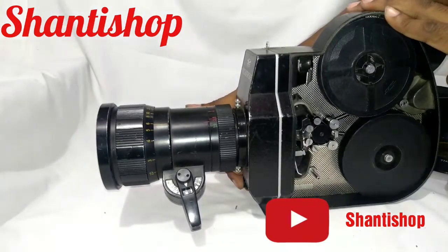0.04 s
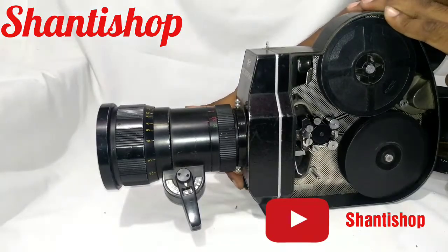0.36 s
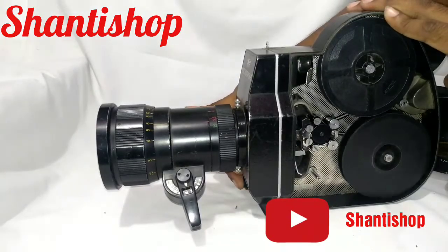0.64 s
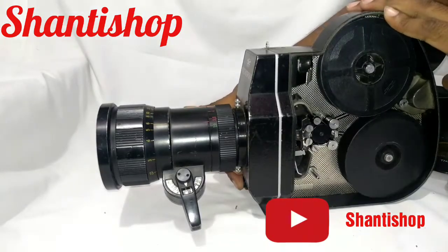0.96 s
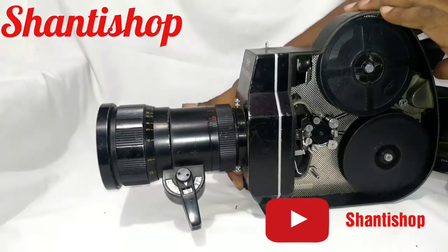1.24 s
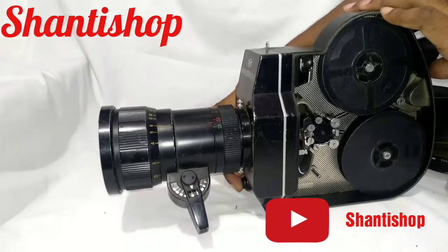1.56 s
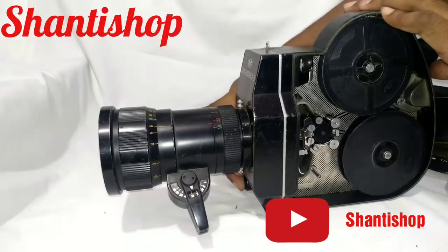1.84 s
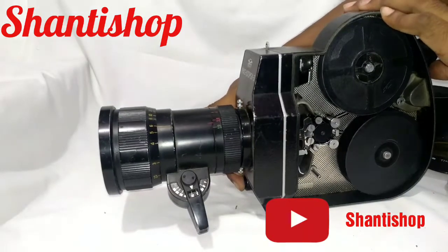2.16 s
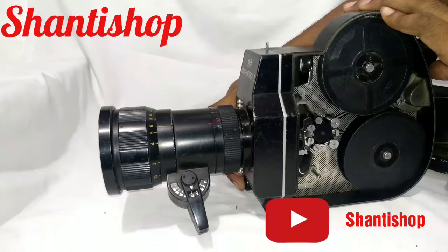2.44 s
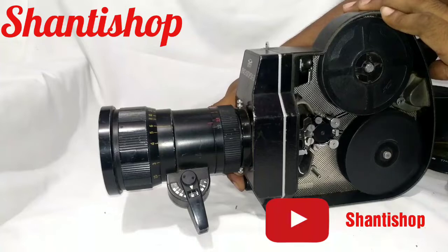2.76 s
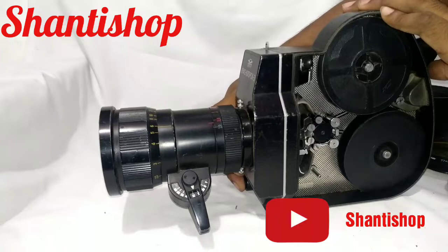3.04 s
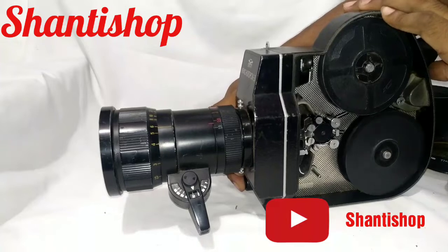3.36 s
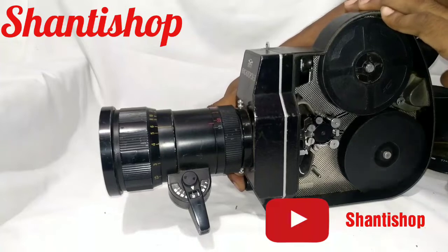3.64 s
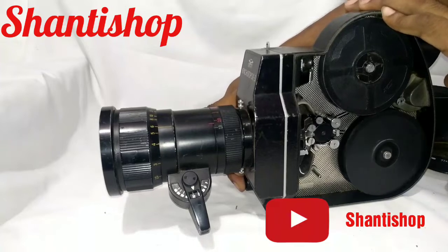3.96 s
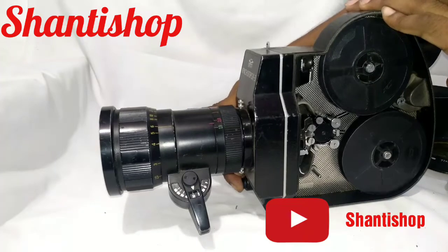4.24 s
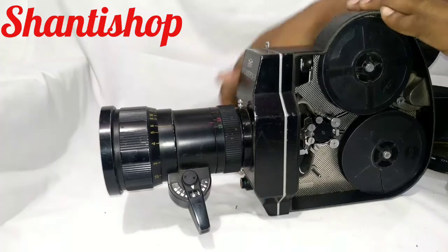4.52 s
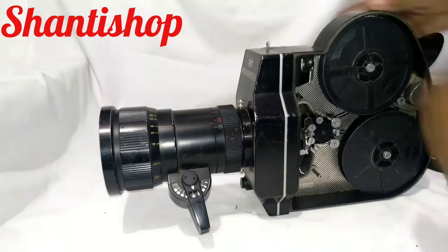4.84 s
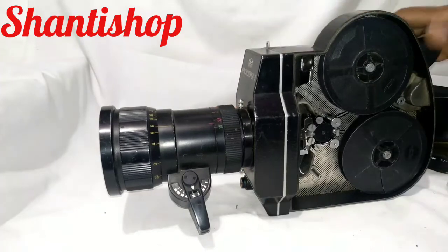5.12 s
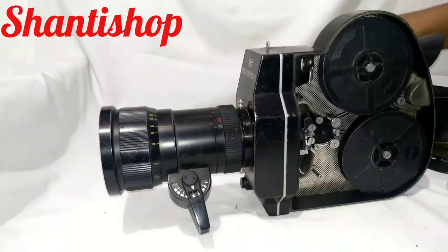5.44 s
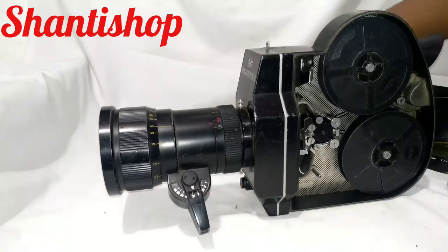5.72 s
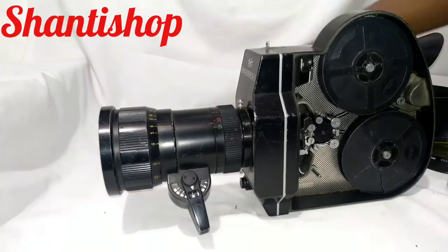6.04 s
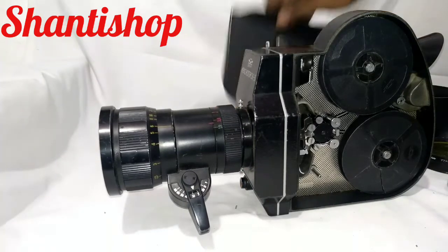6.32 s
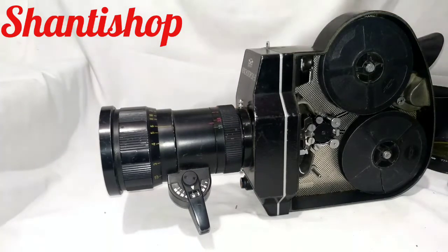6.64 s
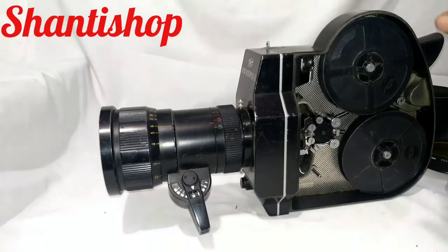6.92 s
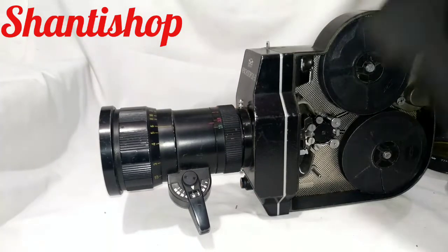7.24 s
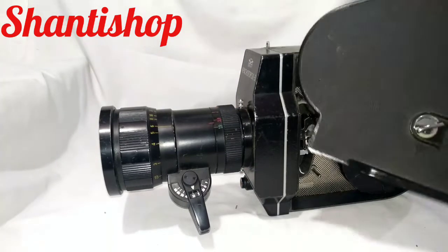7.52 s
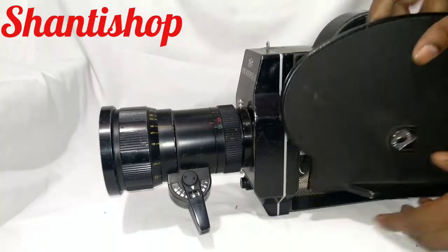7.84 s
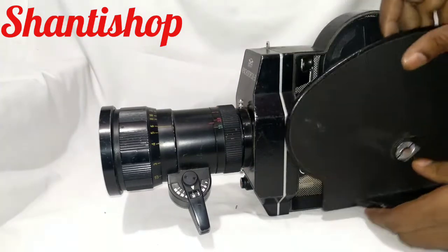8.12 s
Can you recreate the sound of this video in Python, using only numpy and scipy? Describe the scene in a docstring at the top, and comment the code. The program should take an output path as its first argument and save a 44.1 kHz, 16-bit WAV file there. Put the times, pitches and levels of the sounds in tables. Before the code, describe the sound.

A small film camera whirrs and clatters loudly, stops, restarts and stops again, followed by faint rustling and metal cover clanks.

```python
"""First comes the whirr and clatter of a hand-held film camera running with its side open in a small room.
Gears whine and rattle in the metal body while the claw strikes three times a frame. A catch knocks the
drive to a shuddering halt and small springs ring on; it spins up again, holds and is stopped once more.
Then a hand leaves the trigger, cloth rustles, and the side cover scrapes and clanks against the body."""
import sys
import numpy as np
from scipy import signal
from scipy.fft import rfft, irfft
from scipy.io import wavfile
from scipy.ndimage import uniform_filter1d

SR = 44100
rng = np.random.default_rng(int(sys.argv[2]) if len(sys.argv) > 2 else 0)


def inscribe(sig):
    """Save sig as 16-bit PCM at rate SR to the path in sys.argv[1].

    A 1-D sig is mono; a 2-D sig holds one channel per row.
    Samples are clipped to [-1, 1] before scaling.
    """
    pcm = np.round(np.clip(np.atleast_2d(sig).T, -1, 1) * 32767)
    wavfile.write(sys.argv[1], SR, pcm.astype(np.int16))


N = 360738
TIME = np.arange(N) / SR
SPROCKET_TEETH = 8

# cues of each run: up to speed t/s, catch drops t/s, at rest t/s, rattle level/dB, shudder level/dB
FIRST_RUN = (0, 1.545, 1.72, -24.8, -30.5)
SECOND_RUN = (2.052, 4.222, 4.371, -25.65, -26.8)
# film speed in the first run: t/s, speed/(frames/s)
FIRST_SPEED = [(0, 33.25), (.95, 33.23), (1.12, 32.85), (1.6, 32.8), (1.7, 20), (1.72, 10)]
# resonances of the camera body and of the claw's gate: f/Hz, width/Hz, lift/dB
BODY_MODES = [(383, 87, 3.5), (870, 130, 4.5), (1125, 135, 9), (1604, 220, 5), (1915, 110, 5),
              (2010, 100, 6.5), (2160, 210, 6.5), (2670, 200, 1.5), (3340, 160, 3.5), (3590, 130, 6.5),
              (3840, 160, 7), (4860, 380, 2.8), (6090, 130, 5), (6320, 230, 7.7), (6860, 110, 2.5),
              (7380, 500, 3), (8440, 350, 2.5), (10680, 320, 3.5), (14400, 700, 5)]
GATE_MODES = [(1110, 150, 8), (2000, 490, -1), (3490, 270, 5.5), (4840, 370, 4.5), (5500, 250, -2),
              (6290, 330, 7.2), (7300, 400, 1.5), (8650, 600, 5), (10200, 500, 2.5)]
# tone of a bright steel contact and of a dull body thud: f/Hz, relative level/dB
STEEL_EQ = [(100, -41), (700, -21), (1500, -7), (3000, -5), (5000, 1.5), (6500, 6), (9000, 2.5), (12000, 4),
            (15500, -5.5)]
THUD_EQ = [(50, -38), (150, -20), (500, -5.5), (1100, -1), (2200, -1.5), (4000, -6.5), (8000, -9.5),
           (15500, -17)]
# modes of the side cover: f/Hz, rim-hit level/dB, face-hit level/dB, t60/s
COVER_MODES = [(575, -16.5, -15.5, 0.13), (890, -15, -7.5, 0.13), (1202, -8.5, -17, .15),
               (1296, -20, -2.5, 0.14), (1440, -8.5, -11, 0.029), (1950, -19, -8, 0.04),
               (2265, -15, -18, 0.08), (2490, -9, -9, 0.035), (3620, -25, -13, 0.052),
               (3855, -1, -21, 0.065), (4720, -7, -14, 0.035), (5050, -17, -13, 0.067),
               (5739, -16, -34, .11), (6080, -16, -36, .1), (6430, -8, -36, 0.06), (7360, -26, -28, 0.11)]


def from_db(db):
    """Decibels to gain."""
    return 10 ** (np.asarray(db) / 20)


def unit_power(x):
    """Scale to an RMS of 1."""
    return x / np.sqrt(np.mean(x ** 2) + 1e-20)


def automation(points):
    """Join (time, value) points into a curve at every sample."""
    return np.interp(TIME, *np.transpose(points))


def drift(rate_hz):
    """Smooth random wander with an RMS of 1."""
    hop, settle = 40, 2000
    pole = np.exp(-2 * np.pi * rate_hz * hop / SR)
    noise = rng.standard_normal(N // hop + settle + 2)
    slow = signal.lfilter([1], [1, -2 * pole, pole * pole], noise)[settle:]
    return np.interp(np.arange(N) / hop, np.arange(len(slow)), unit_power(slow))


def grains(per_s, spread_db):
    """Dense random ticks of uneven size, at unit power."""
    ticks = (rng.random(N) < per_s / SR) * rng.choice([-1, 1], N)
    return unit_power(ticks * from_db(spread_db * np.clip(rng.standard_normal(N), -2, 2)))


def pass_filter(x, hz, kind, order=3):
    """Keep the low or the high side of an edge."""
    return signal.sosfilt(signal.butter(order, hz, kind, fs=SR, output="sos"), x)


def colour(x, eq, resonances=()):
    """A broad EQ curve plus resonant peaks; white noise keeps its power."""
    size = 8192
    hz = np.maximum(np.fft.rfftfreq(size, 1 / SR), 1)
    eq_hz, eq_db = np.transpose(eq)
    db = np.interp(np.log(hz), np.log(eq_hz), eq_db)
    for centre, width, lift in resonances:
        db += lift / (1 + (2 * (hz - centre) / width) ** 2)
    cepstrum = irfft(np.log(from_db(db)))[:size // 2]
    cepstrum[1:] *= 2   # folding makes the response minimum phase
    response = irfft(np.exp(rfft(cepstrum, size)))
    return signal.fftconvolve(x, response / np.linalg.norm(response))[:N]


def drive_effort(run, ease_s=.25, brake_s=.025):
    """Gear effort in dB below full: it spins up, holds, slackens, is braked, coasts and dies."""
    up_s, catch_s, rest_s = run[:3]
    since_catch = np.maximum(TIME - catch_s, 0)
    spin_up = 360 * np.maximum(up_s - TIME, 0)
    ease = 1.3 * np.clip((TIME - catch_s) / ease_s + 1, 0, 1)
    brake = 2.2 * np.minimum(since_catch / brake_s, 1)
    coast = 115 * since_catch
    die_away = 550 * np.maximum(TIME - rest_s, 0)
    return -np.minimum(spin_up + ease + brake + coast + die_away, 200)


def teeth_rattle(frames, wear_share=.55, low_hz=3600, high_hz=7000, play=.004):
    """Tooth ticks in three bands; worn teeth repeat part of the lowest on every sprocket turn."""
    size = 11000
    turn = (frames + play * drift(10)) / SPROCKET_TEETH % 1
    worn = rng.standard_normal(size)[(turn * size).astype(int) % size]
    lows = np.sqrt(wear_share) * worn + np.sqrt(1 - wear_share) * grains(per_s=7500, spread_db=2)
    mids = pass_filter(grains(per_s=11000, spread_db=1.5), low_hz, "high")
    highs = pass_filter(grains(per_s=7000, spread_db=1.8), high_hz, "high")
    return pass_filter(lows, low_hz, "low") + pass_filter(mids, high_hz, "low") + highs


def chatter(age, decay_s, hardness):
    """Envelope of a metal contact: a fast rise to 1, then bounces that end sooner when it is hard."""
    u = np.maximum(age, 0) / decay_s
    return (2 * np.e * hardness) ** (.5 / hardness) * np.sqrt(u) * np.exp(-u ** hardness)


def claw(frames, speed, accent_db, uneven_db=.6):
    """Envelopes of the claw's pull, accented once a sprocket turn, and its two return contacts."""
    # contacts within a frame: position/cycles, relative level/dB, decay/s
    contacts = [(0, 0, 0.0023), (.39, -5.8, 0.0034), (.62, -9.5, 0.005)]
    strokes = []
    for position, db, decay_s in contacts:
        frame, phase = np.divmod(frames - position, 1)
        scatter_db = rng.normal(0, uneven_db, int(np.ptp(frame)) + 1)[(frame - frame.min()).astype(int)]
        accented = (frame % SPROCKET_TEETH == 0) & (position == 0)
        gain = from_db(db + scatter_db + accent_db * accented)
        strokes.append(gain * chatter(phase / speed, decay_s, hardness=2))
    return strokes[0], sum(strokes[1:])


def gear_whine(frames, tones, top_speed, waver_db=2.6, play=.01, flutter=.06, trim_db=-.5):
    """Tooth-mesh tones follow the film speed; each flutters, and gear play smears the higher ones."""
    loose_frames = frames + play * drift(3.24) / 2
    out = np.zeros(N)
    for hz, db in tones:
        low_rolloff = hz / np.hypot(hz, 240)   # the lowest gear tones are played softer
        cycles = hz / top_speed * loose_frames + flutter * np.sqrt(hz / 1000) * drift(9) + rng.random()
        gain = low_rolloff * from_db(db + trim_db + waver_db * drift(14))
        out += gain * np.sqrt(2) * np.sin(2 * np.pi * cycles)
    return out


def camera_run(run, speeds, pulls, tones, rattle_eq, stroke_s, accent_db, return_db, whine_db,
               reel_wobble, motor_wobble):
    """One run as (clatter, whine): teeth and claw sound through body and gate while the gears sing."""
    _, catch_s, _, running_db, _ = run
    speed, pull_db, effort_db = automation(speeds), automation(pulls), drive_effort(run)
    frames = np.cumsum(speed) / SR
    frames -= np.interp(stroke_s, TIME, frames)   # a pull lands at stroke_s

    # the teeth press harder at one point of each shaft's turn
    reel, shutter, motor, mesh = (np.cos(2 * np.pi * rate * frames) for rate in (3 / 8, 1 / 2, 11 / 4, 24))
    pressure = (1 + reel_wobble * reel) * (1 + motor_wobble * motor)
    pressure *= (1 + .15 * mesh) * (1 + .049 * shutter)
    rattle_db = running_db + effort_db
    rattle_gain = from_db(rattle_db + .6 * drift(27) + .35 * drift(7)) * pressure + shudder(run)
    rattle = colour(rattle_gain * teeth_rattle(frames), rattle_eq, BODY_MODES)

    pull, back = claw(frames, speed, accent_db * (pull_db < -17))   # no accent under heavy load
    pull *= from_db(pull_db + effort_db) * (TIME < catch_s)
    back *= from_db(rattle_db + return_db)
    strokes = colour((pull + back) * grains(per_s=16000, spread_db=2), STEEL_EQ, GATE_MODES)
    thumps = colour(from_db(-9) * pull * rng.standard_normal(N), THUD_EQ, BODY_MODES)

    top_speed = max(rate for _, rate in speeds)
    whine_gain = from_db(whine_db + 1.6 * effort_db)   # the whine fades faster than the rattle
    return rattle + strokes + thumps, whine_gain * gear_whine(frames, tones, top_speed)


def first_run():
    """The camera is already at speed; its claw pulls hardest shortly before the stop."""
    # force of the claw's pull: t/s, level/dB
    pulls = [(0, -18.5), (.6, -18.3), (.9, -22.5), (1.08, -20), (1.13, -15.5), (1.23, -10.5), (1.34, -14.5),
             (1.42, -16.6), (1.52, -12.6)]
    # gear tones at top speed: f/Hz, level/dB
    tones = [(183.0, -53.5), (274.5, -49), (549.1, -52), (732.1, -52), (1464, -46.5), (1599, -42),
             (2094, -46), (2261, -47), (2961, -52), (3295, -46.5), (3924, -47)]
    # tone of the tooth rattle: f/Hz, relative level/dB
    rattle_eq = [(50, -40), (90, -24), (135, -3.5), (190, -4.5), (400, -3), (640, -4.5), (900, -2.8),
                 (1350, -1.8), (2600, 1.5), (4400, 3), (5700, 1), (9000, 2), (11200, 5), (13300, -2),
                 (15500, -5.5)]
    return camera_run(FIRST_RUN, FIRST_SPEED, pulls, tones, rattle_eq, stroke_s=.4327, accent_db=3,
                      return_db=-1, whine_db=0, reel_wobble=.033, motor_wobble=.082)


def gear_song(teeth=24, play=.009, waver_db=2):
    """In the first run, the gear that turns once a frame sings at its tooth rate, wavering with play."""
    # swell of the gear's tone: t/s, level/dB
    levels = [(0, -49), (.08, -44), (.45, -40), (.9, -40), (1.0, -42.5), (1.28, -43.5), (1.42, -52)]
    turns = np.cumsum(automation(FIRST_SPEED)) / SR + play * drift(20) / 2
    gain = from_db(automation(levels) + drive_effort(FIRST_RUN) + waver_db * drift(35))
    return gain * np.sqrt(2) * np.sin(2 * np.pi * teeth * turns)


def low_rumble(level_db=-67, lumpy_db=12):
    """A faint low rumble comes and goes in uneven lumps while the camera runs."""
    # tone of the rumble: f/Hz, relative level/dB
    rumble_eq = [(25, -24), (55, -8), (100, 0), (170, -3), (260, -23), (800, -48)]
    running = from_db(drive_effort(FIRST_RUN)) + from_db(drive_effort(SECOND_RUN))
    lumps = from_db(level_db + lumpy_db * np.clip(drift(8.1), -2, 1.5))
    return colour(running * lumps * rng.standard_normal(N), rumble_eq)


def room(x, wet_db, t60, wall_hz, predelay_s=.0023):
    """Add the dense, slightly dull reflections of a small furnished room."""
    age = TIME[:SR // 2]
    tail = rng.standard_normal(len(age)) * from_db(-60 * age / t60) * (age > predelay_s)
    tail = pass_filter(tail / np.linalg.norm(tail), wall_hz, "low", order=1)
    return x + from_db(wet_db) * signal.fftconvolve(x, tail)[:N]


def room_tone(camera, level_db=-45.5, duck_db=-28, knee_db=-33):
    """A steady bed of room noise that ducks while the camera is loud."""
    # tone of the room's air: f/Hz, relative level/dB
    air_eq = [(15, -38), (25, -17), (102, -11), (157, -5), (277, -7.5), (363, -4.5), (427, -5), (531, -3.5),
              (863, -8), (1330, -8.5), (1560, -12), (2050, -13), (4140, -26.5), (6500, -28.7),
              (10100, -27.2), (16000, -34.5)]
    # room resonances: f/Hz, width/Hz, lift/dB
    room_modes = [(47, 11, 13), (148, 40, 4), (378, 28, 7), (1200, 200, 1.5)]
    power = uniform_filter1d(camera ** 2, size=1300)
    ducking = power / (power + from_db(knee_db) ** 2)
    return from_db(level_db + duck_db * ducking) * colour(rng.standard_normal(N), air_eq, room_modes)


def impulses(times, heights):
    """Single-sample blows."""
    out = np.zeros(N)
    out[np.round(times * SR).astype(int)] = heights
    return out


def contact(at_s, db, decay_s):
    """One hit as a short spray of micro-impacts."""
    out, start = np.zeros(N), round(at_s * SR)
    age = TIME[:min(SR // 10, N - start)]
    envelope = from_db(db) * chatter(age, decay_s, hardness=1.25)
    out[start:start + len(age)] = envelope * rng.standard_normal(len(age))
    return out


def knocks(steel_decay_s=.0018, thud_extra_s=.0018):
    """Catch and trigger strike gate and body; heavier thuds last longer and ring the springs more."""
    # catch and trigger knocks, stray drive ticks, light touches: t/s, level/dB, thud share/0-1
    hits = [(1.5509, -9, 0), (1.5808, -12, .09), (1.611, -8.3, 0), (1.6157, -11.3, 0), (1.6456, -10.8, .13),
            (1.658, -28.5, .75), (1.7012, -23.5, .16), (1.7112, -23.5, .5), (1.7215, -31, 1),
            (1.883, -48, .1), (1.928, -39, .6), (1.950, -46, .1), (1.973, -33.5, .8), (2.016, -31, .7),
            (2.404, -21, .05), (3.087, -19.5, .05), (3.844, -20, .05), (4.2344, -9.3, 0),
            (4.2655, -10.5, .11), (4.2703, -13.5, .2), (4.3002, -10, .14), (4.3621, -14.8, .25),
            (4.3735, -29.5, 1), (4.511, -34, .05), (4.5548, -33, .2), (4.8086, -47, .1)]
    times, levels, thuds = np.transpose(hits)
    decays = steel_decay_s + thud_extra_s * thuds
    sharp = sum(contact(*hit) for hit in zip(times, levels, decays))
    dull = sum(thud * contact(*hit) for thud, *hit in zip(thuds, times, levels, decays))
    blows = impulses(times, from_db(levels) * (.15 + thuds))
    return colour(sharp, STEEL_EQ, GATE_MODES) + colour(dull, THUD_EQ, BODY_MODES), springs(blows)


def springs(blows, waver_db=1.5):
    """Blows feed small springs that ring down; where the gears stop decides which are free."""
    # spring tones: f/Hz, first-stop level/dB, second-stop level/dB, t60/s
    spring_modes = [(3430, -48, -37, .8), (3548, -38, -46, 1.4), (5200, -42, -26, .25),
                    (5952, -25, -24, .42), (6025, -17.5, -24, .23), (6686, -40, -25, .28),
                    (6918, -30, -26, .25), (7940, -36, -31, .5), (8538, -29, -33, .38),
                    (9749, -23, -28, .36), (11185, -28, -27, .38)]
    restarted = TIME > SECOND_RUN[0]
    out = np.zeros(N)
    for hz, first_db, second_db, t60 in spring_modes:
        kicks = blows * from_db(np.where(restarted, second_db, first_db))
        energy = signal.lfilter([1], [1, -from_db(-120 / (t60 * SR))], kicks ** 2 + 1e-18)
        envelope = np.sqrt(energy) * from_db(waver_db * drift(20))
        out += envelope * np.sin(2 * np.pi * (hz * TIME + rng.random()))
    return out


def shudder(run, rise_db_per_s=500, fall_db_per_s=550):
    """Gain of a run's last rattle, as the gears rock back through their play."""
    _, _, rest_s, _, peak_db = run
    below_peak_db = np.maximum(rise_db_per_s * (rest_s - TIME), fall_db_per_s * (TIME - rest_s))
    return from_db(peak_db - np.minimum(below_peak_db, 200))


def second_run():
    """The drive spins up again and runs a touch slower, with a lighter, more accented claw."""
    # film speed: t/s, speed/(frames/s)
    speeds = [(1.98, 14), (2.04, 28), (2.12, 32.25), (4.26, 32.25), (4.36, 16)]
    # force of the claw's pull: t/s, level/dB
    pulls = [(2.09, -24.6), (3.8, -25.8), (4.21, -30)]
    # motor and gear tones at top speed: f/Hz, level/dB
    tones = [(177.4, -54), (266.1, -53), (354.8, -62), (443.4, -52), (532.1, -53), (709.5, -50),
             (774, -50.5), (838, -53.8), (1419, -47.5), (1548, -47), (1935, -50), (2030, -46), (3187, -49),
             (3607, -47.5), (3806, -47)]
    # tone of the tooth rattle: f/Hz, relative level/dB
    rattle_eq = [(50, -40), (95, -15), (150, -2), (400, -2.5), (640, -2), (900, -2.5), (1350, 1), (2600, 1),
                 (4400, 2.5), (5700, 2.5), (9000, 4), (11200, 2.5), (13300, -0.5), (15500, -6)]
    return camera_run(SECOND_RUN, speeds, pulls, tones, rattle_eq, stroke_s=2.28, accent_db=7.5,
                      return_db=0, whine_db=.8, reel_wobble=.048, motor_wobble=.11)


def swell(peak_s, width_s):
    """A smooth rise to 1 and fall."""
    return np.exp(-((TIME - peak_s) / width_s) ** 2)


def brief_tone(peak_s, width_s, hz, level_db, flutter):
    """A slightly unsteady tone that comes and goes."""
    cycles = hz * TIME + flutter * drift(15)
    return np.sqrt(2) * from_db(level_db) * swell(peak_s, width_s) * np.sin(2 * np.pi * cycles)


def cloth(trim_db=1, uneven_db=1.4):
    """Fibres slip in tiny scratchy ticks; each stroke of the arm swells and fades."""
    # sleeve strokes: peak t/s, level/dB, rise/s, fall/s, high-pass f/Hz
    strokes = [(4.82, -57.5, .06, .08, 3500), (5.12, -57, .05, .1, 5500), (5.4, -43.5, .065, .06, 6800),
               (5.45, -39, .014, .016, 5300), (5.57, -52, .03, .035, 6000), (5.84, -52, .08, .14, 6000),
               (6.022, -37.5, .026, .024, 5400), (6.052, -44, .006, .012, 2200),
               (6.12, -43.5, .075, .08, 5800), (6.28, -43.5, .07, .05, 6200), (6.56, -56.5, .07, .08, 6500),
               (6.665, -45, .024, .032, 7300), (7.17, -55.5, .42, .3, 6000), (7.33, -50.5, .03, .025, 8000),
               (7.77, -51, .08, .07, 5800)]
    # tone of the fabric: f/Hz, relative level/dB
    fabric_eq = [(800, -8), (2000, 1), (3200, 1), (5000, -1), (7000, 0), (10000, 1), (13000, -2.5),
                 (16000, -13)]
    slips = grains(per_s=2200, spread_db=3.5) * from_db(uneven_db * drift(60))
    out = np.zeros(N)
    for peak_s, db, rise_s, fall_s, edge_hz in strokes:
        from_peak = np.abs(TIME - peak_s) / np.where(TIME < peak_s, rise_s, fall_s)
        motion = np.exp(-np.minimum(from_peak, 3) ** 2)
        rustle = pass_filter(np.roll(slips, rng.integers(N)), edge_hz, "high", order=2)
        out += from_db(db + trim_db) * motion * rustle
    return colour(out, fabric_eq)


def cover_scrapes(width_hz=90, lift_db=17):
    """Gritty slips ring the cover's modes as it is picked up and brought over."""
    # light scrapes: t/s, level/dB, half length/s
    slips = [(6.28, -53, .04), (7.145, -57, .02), (7.23, -54.5, .022), (7.68, -54.5, .015)]
    # tone of the grit: f/Hz, relative level/dB
    grit_eq = [(2500, -30), (4500, -6), (6000, -3), (8000, -14), (14000, -30)]
    rubbing = sum(from_db(db) * swell(peak_s, width_s) for peak_s, db, width_s in slips)
    resonances = [(hz, width_hz, lift_db) for hz, *_ in COVER_MODES]
    return colour(rubbing * grains(per_s=900, spread_db=3.5), grit_eq, resonances)


def ring(blows, hz, t60):
    """One damped mode: a unit blow starts a sine of height 1."""
    pole, angle = from_db(-60 / (t60 * SR)), 2 * np.pi * hz / SR
    return signal.lfilter([0, np.sin(angle)], [1, -2 * pole * np.cos(angle), pole ** 2], blows + 1e-18)


def cover_clanks():
    """The metal cover cracks against the body; where it is touched decides which modes ring."""
    # cover hits: t/s, ring level/dB, crack level/dB, crack low-pass f/Hz, place/(0 rim to 1 face)
    hits = [(7.846, -13.5, -8, 10500, 0.12), (7.8593, -34, -22, 8000, 0.11),
            (8.127, -17.5, -17.5, 5900, 0.93), (8.157, -21.5, -25, 4500, 0.85), (8.1715, -23, -22, 5500, 1)]
    times, levels, _, _, place = np.transpose(hits)
    rings, cracks = np.zeros(N), np.zeros(N)
    for k, (hz, rim_db, face_db, t60) in enumerate(COVER_MODES):
        strength = from_db(levels + rim_db + place * (face_db - rim_db))
        arrival = times + rng.uniform(0, .0015)   # bending waves cross the plate at different speeds
        polarity = (-1) ** (k // 2)
        rings += ring(impulses(arrival, polarity * strength), hz, t60)
    for at_s, _, crack_db, top_hz, _ in hits:
        cracks += pass_filter(contact(at_s, crack_db, decay_s=.0017) + 1e-18, top_hz, "low", order=4)
    # tone of the crack: f/Hz, relative level/dB
    crack_eq = [(100, -24), (250, -10), (400, -9), (1200, -8.5), (2000, -3), (2600, -2), (3200, -5),
                (4200, 0), (6500, -4.5), (10000, -4.5), (15500, -3)]
    return rings, colour(cracks, crack_eq)


def scene():
    """Two runs with their knocks, then cloth and cover, over room tone; the same in both channels."""
    clatter_1, whine_1 = first_run()
    clatter_2, whine_2 = second_run()
    squeak = brief_tone(peak_s=2.019, width_s=.009, hz=1600, level_db=-35, flutter=.3)   # gears come free
    cover_ring, cracks = cover_clanks()
    catches, spring_ring = knocks()
    camera = room(clatter_1 + clatter_2 + catches + low_rumble(), wet_db=-10, t60=.21, wall_hz=9000)
    camera += spring_ring + whine_1 + whine_2 + gear_song() + squeak
    handling = cover_ring + cover_scrapes() + room(cracks + cloth(), wet_db=-6, t60=.17, wall_hz=10000)
    faint_hum = brief_tone(peak_s=6.28, width_s=.12, hz=730, level_db=-52, flutter=.15)
    return np.tile(camera + handling + faint_hum + room_tone(camera), (2, 1))


def record(dry):
    """Soft clipping rounds the peaks and a steep low-pass trims the very top."""
    ceiling, stop_hz = .95, 16400
    low_pass = signal.cheby2(16, 45, stop_hz, fs=SR, output="sos")
    return signal.sosfiltfilt(low_pass, ceiling * np.tanh(dry / ceiling))


dry = scene()
out = record(dry)
inscribe(out)
```